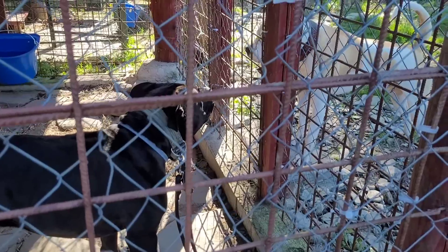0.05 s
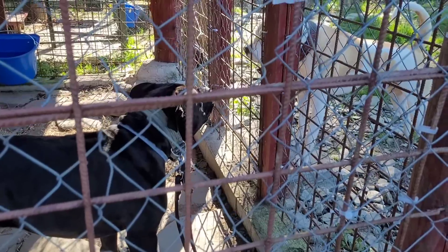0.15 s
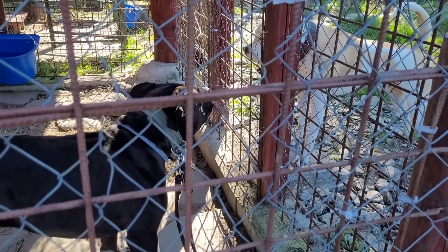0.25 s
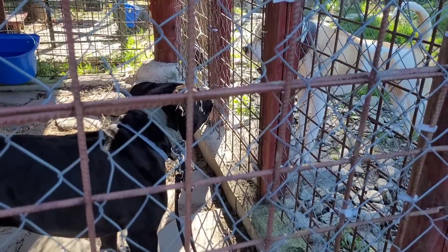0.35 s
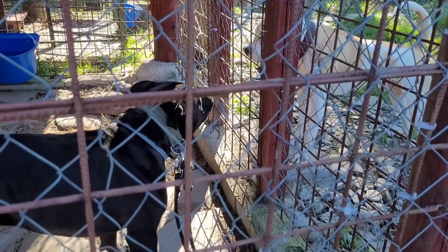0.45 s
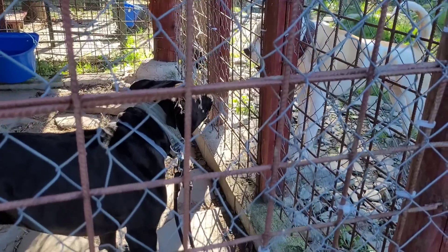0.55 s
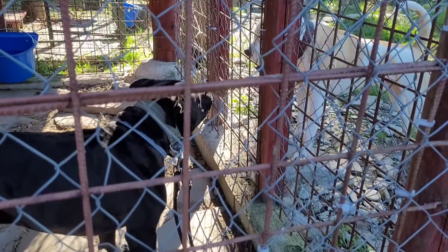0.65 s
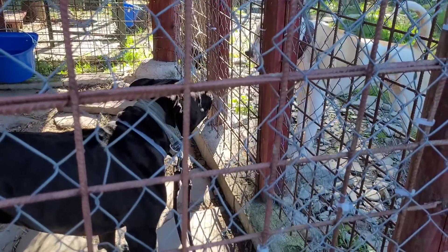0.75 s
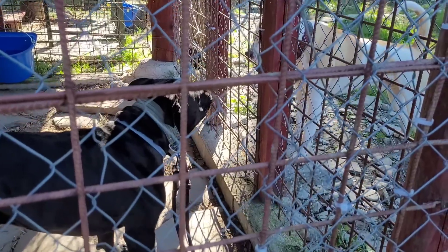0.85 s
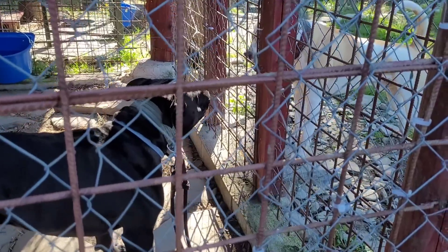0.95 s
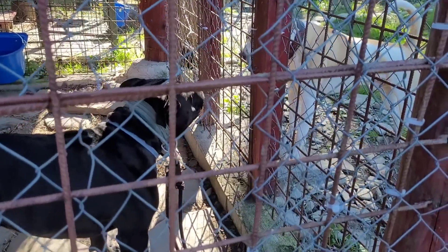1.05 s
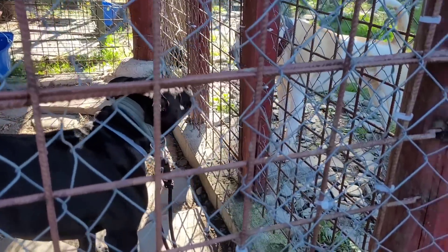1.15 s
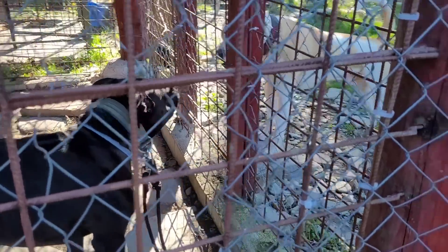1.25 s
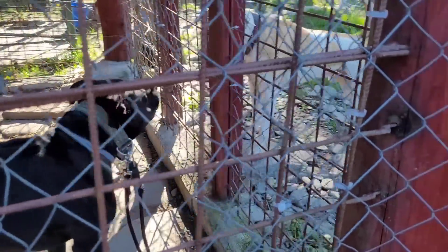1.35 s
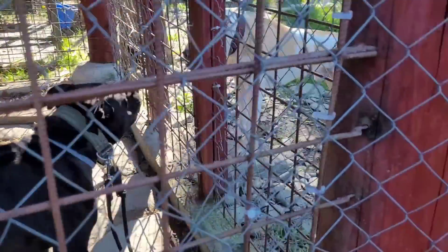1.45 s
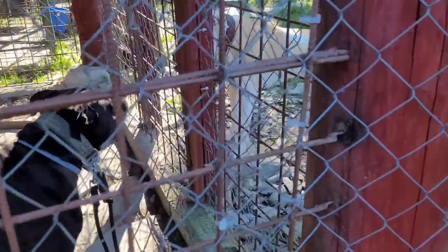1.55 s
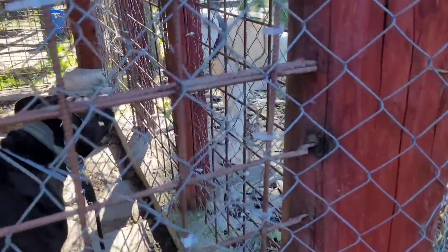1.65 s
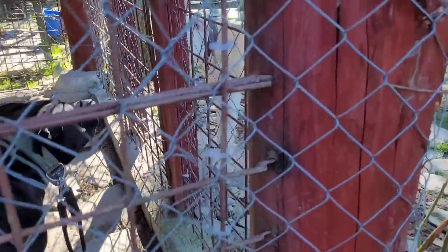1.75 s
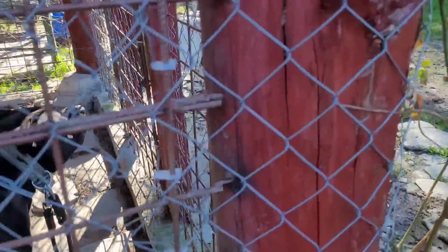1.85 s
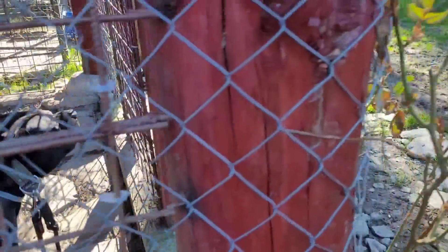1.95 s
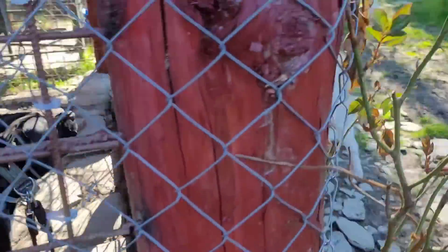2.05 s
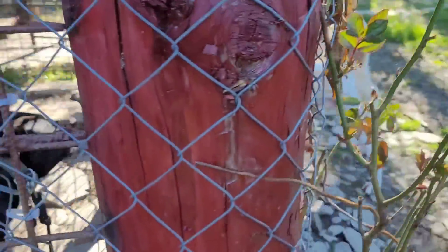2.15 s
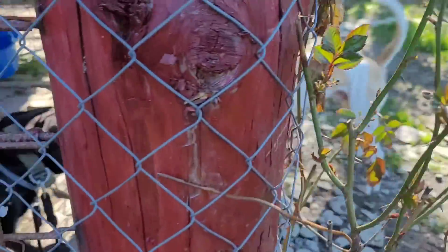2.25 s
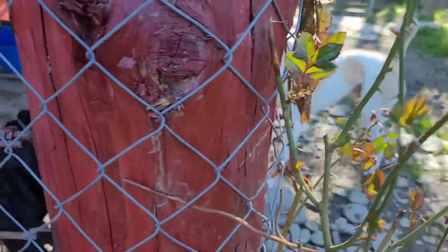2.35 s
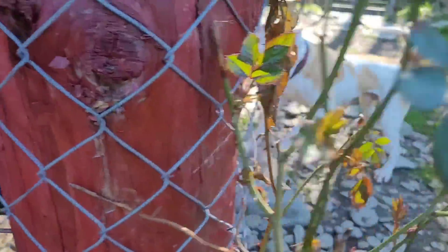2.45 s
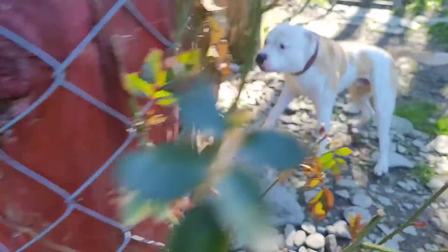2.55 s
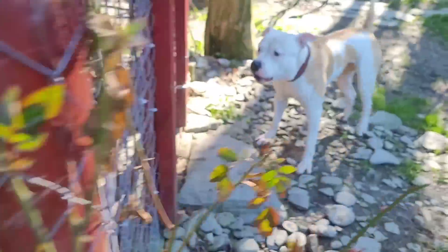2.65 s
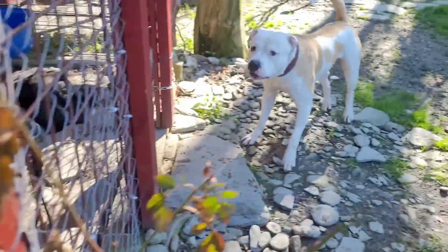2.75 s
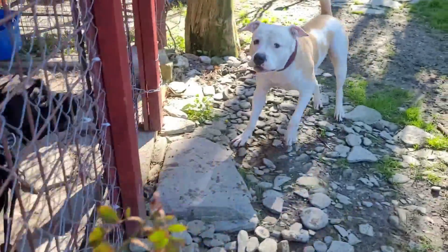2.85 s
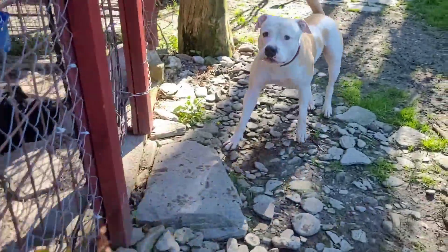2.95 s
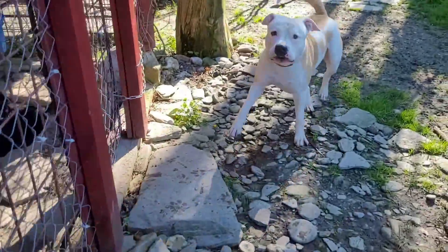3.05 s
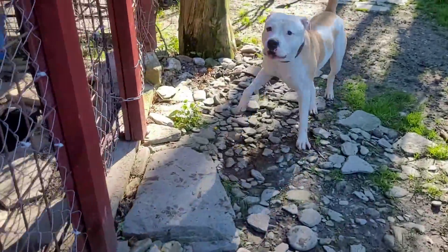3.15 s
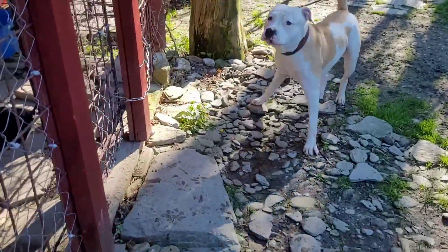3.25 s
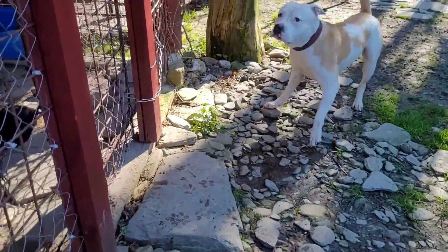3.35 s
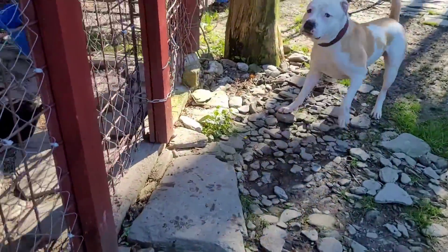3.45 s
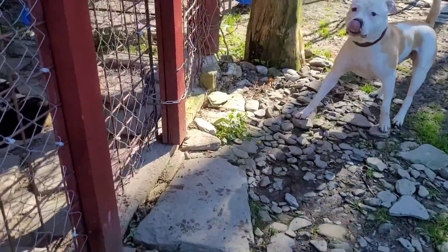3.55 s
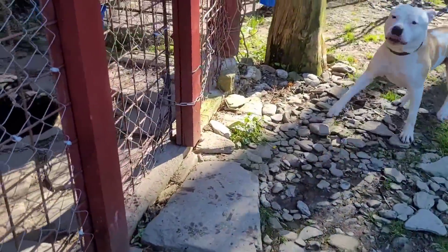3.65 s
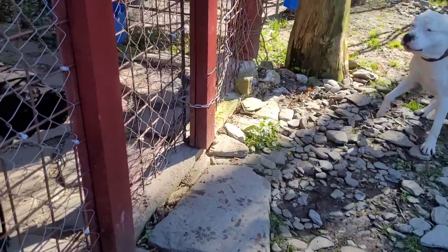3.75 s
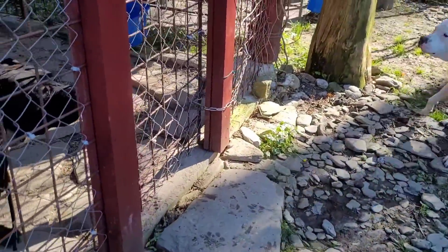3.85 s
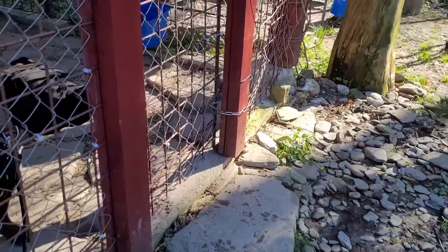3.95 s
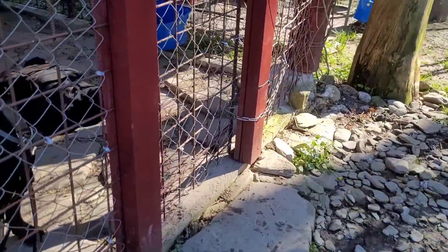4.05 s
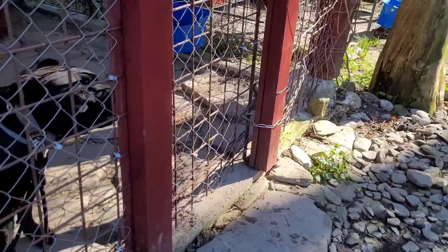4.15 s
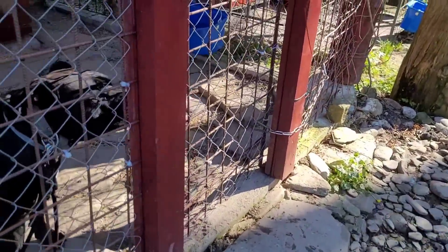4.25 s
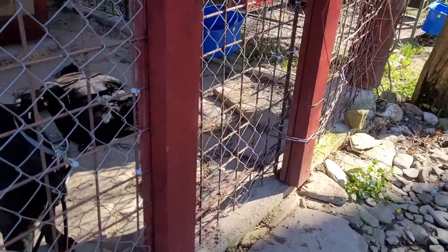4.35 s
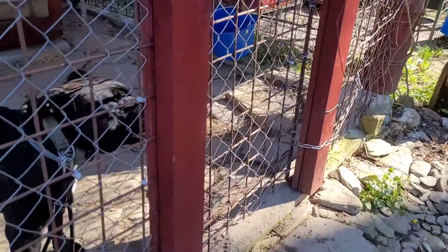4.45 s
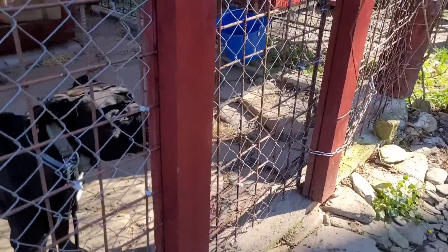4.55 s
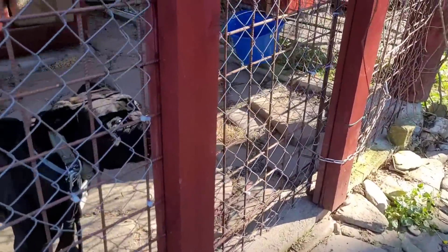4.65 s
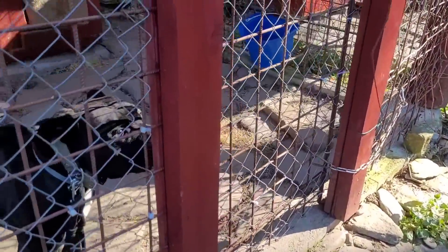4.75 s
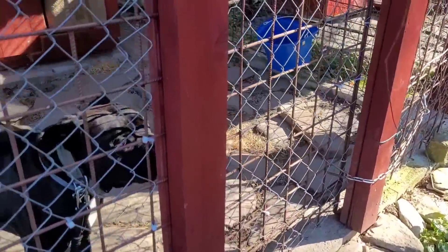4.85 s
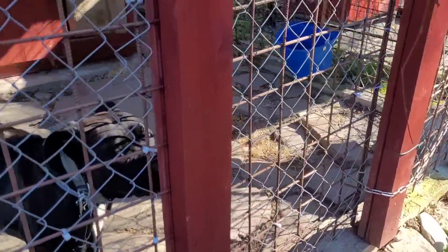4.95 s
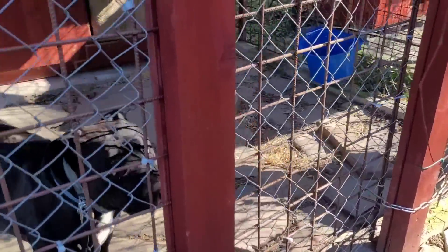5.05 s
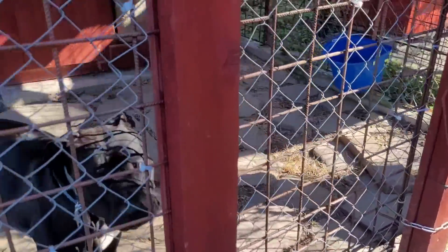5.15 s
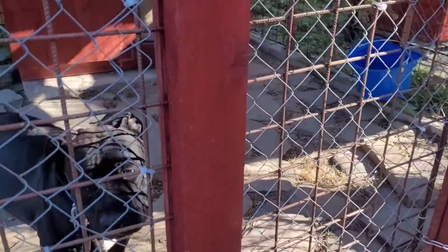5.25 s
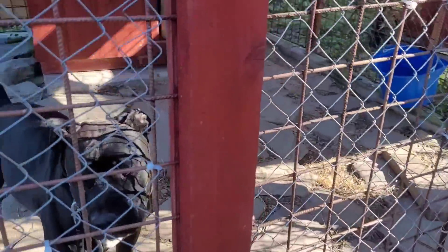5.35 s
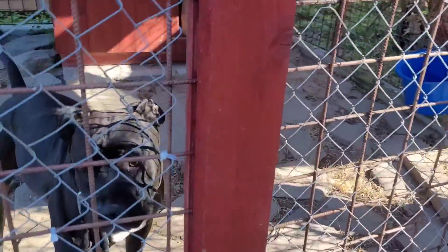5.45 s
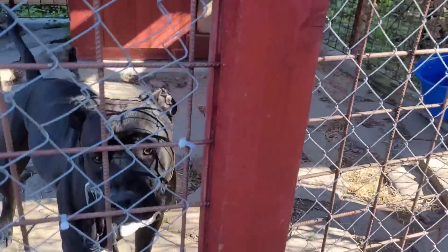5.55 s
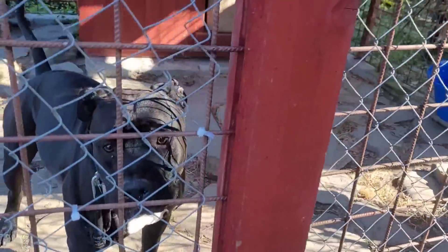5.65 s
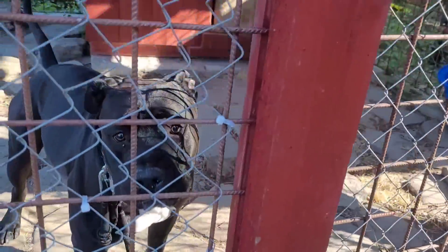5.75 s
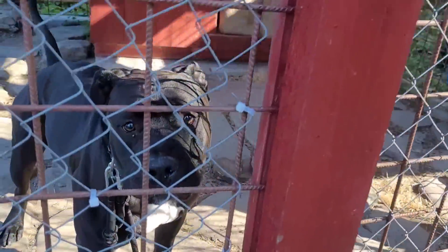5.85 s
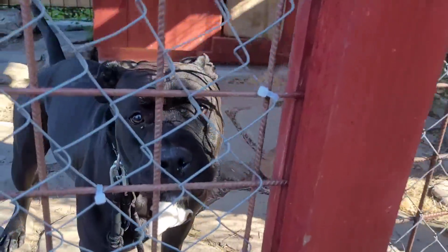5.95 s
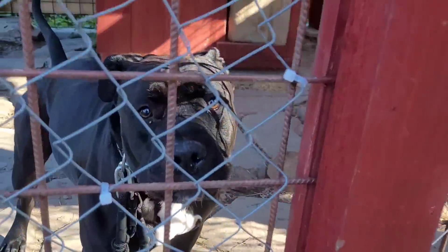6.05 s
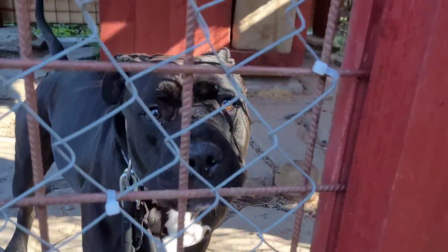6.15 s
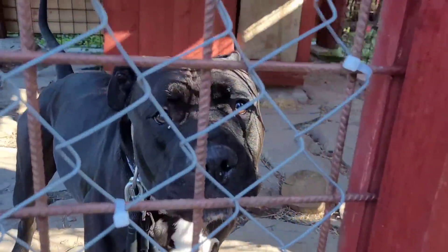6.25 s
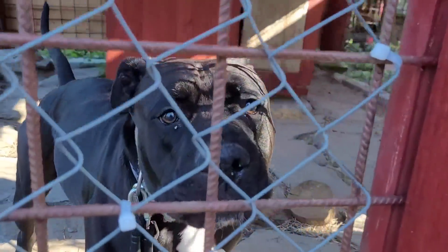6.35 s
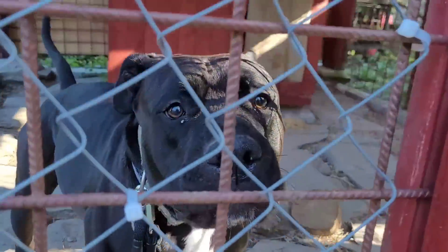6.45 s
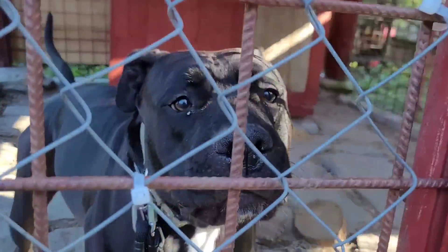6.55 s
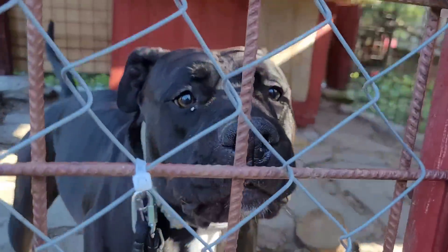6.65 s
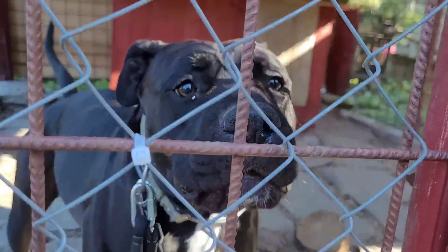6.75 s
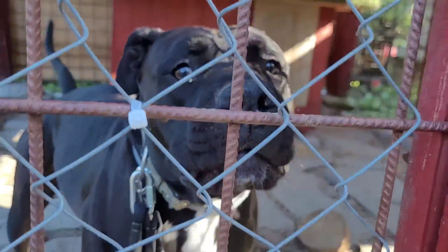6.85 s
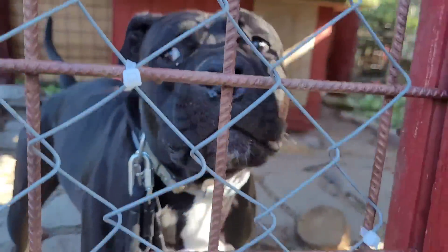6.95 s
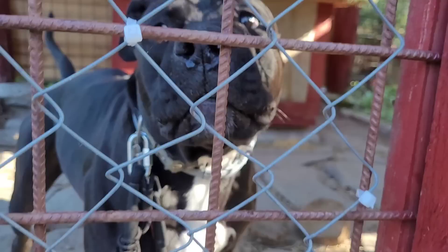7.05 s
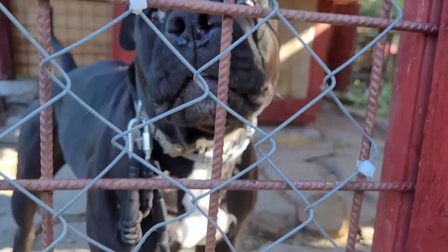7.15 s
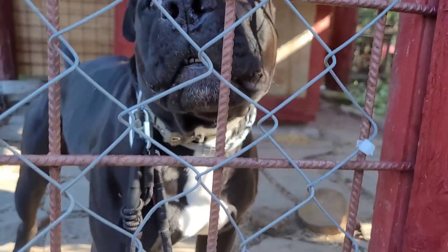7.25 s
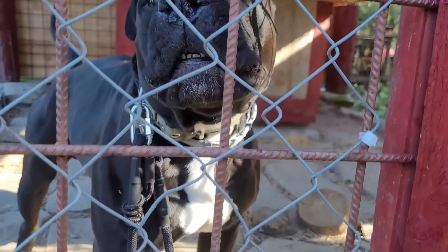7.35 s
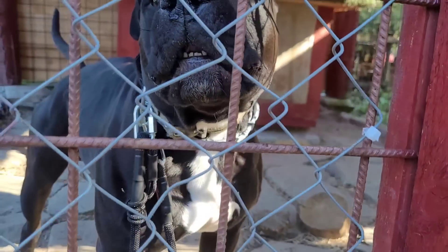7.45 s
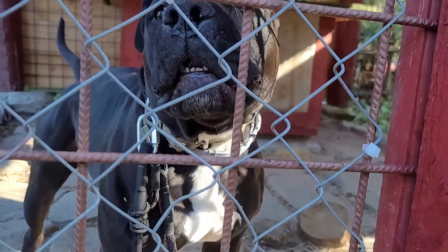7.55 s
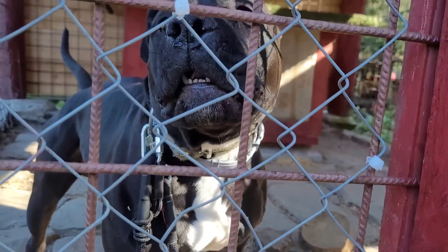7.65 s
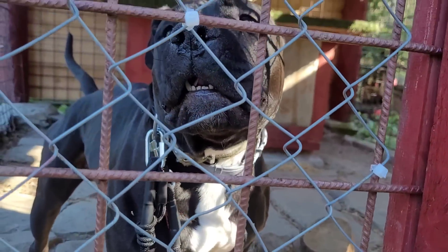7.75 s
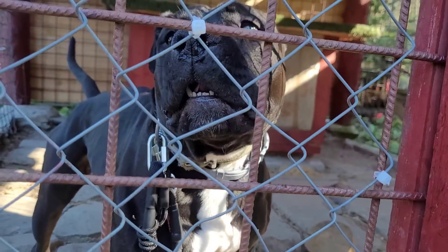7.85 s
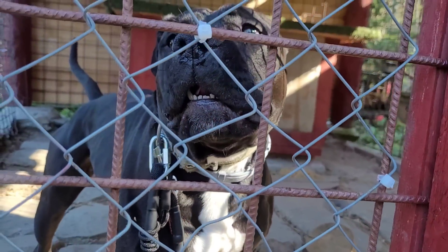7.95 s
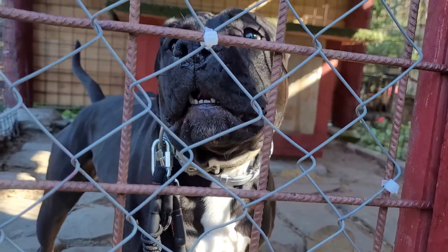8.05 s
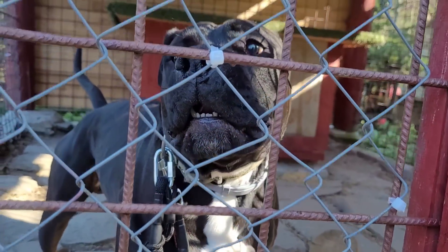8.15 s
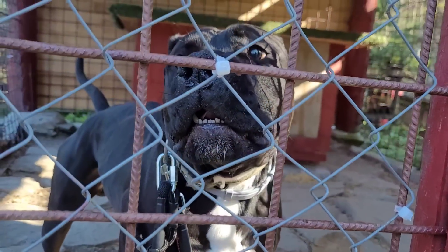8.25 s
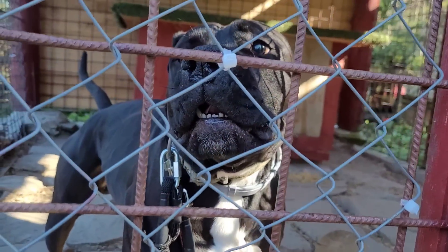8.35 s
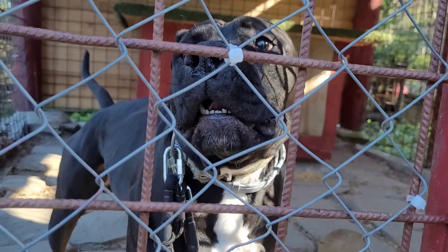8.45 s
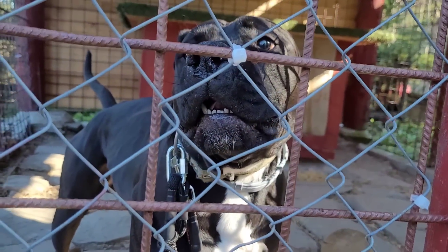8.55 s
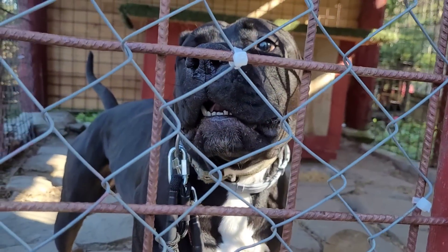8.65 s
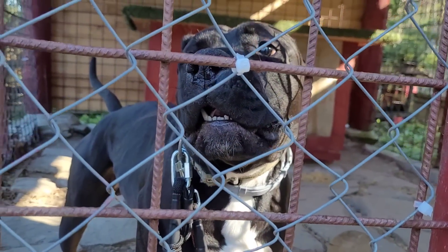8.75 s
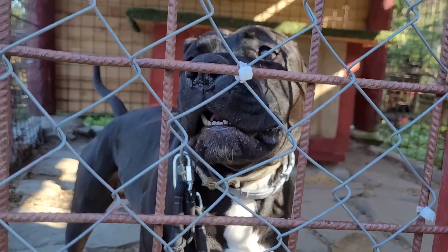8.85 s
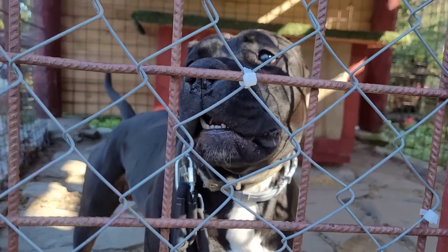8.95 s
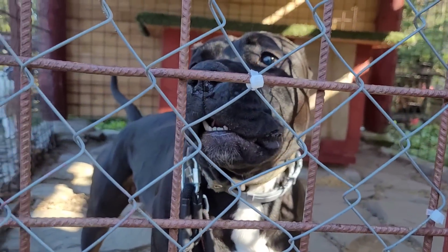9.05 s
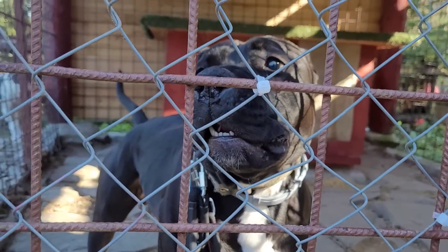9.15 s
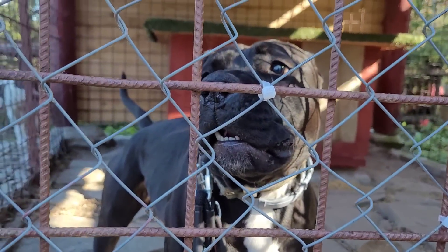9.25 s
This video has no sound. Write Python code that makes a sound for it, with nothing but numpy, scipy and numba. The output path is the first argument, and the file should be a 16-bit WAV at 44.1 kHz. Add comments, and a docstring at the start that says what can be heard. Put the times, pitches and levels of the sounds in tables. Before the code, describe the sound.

A big dog gives long, low, fluttering growls broken by two short bursts of hoarse barking in a quiet yard.

```python
"""A big dog behind a wire fence growls at another dog and breaks into hoarse barks in a stony yard. The growl
is a low buzz from the vocal folds, chopped about twenty times a second by fluttering throat tissue; it tightens
and rises. Each bark is a hard push of air through jaws that open and shut. Stones and collar hardware click,
paws scuff and a small bird whistles once. Behind it all lies the yard's hush, whose level dips for about a
second after barking."""
import sys
import numpy as np
from scipy import signal
from scipy.fft import rfft, irfft, next_fast_len
from scipy.io import wavfile
from scipy.ndimage import uniform_filter1d, map_coordinates
from numba import njit

SR = 44100
rng = np.random.default_rng(int(sys.argv[2]) if len(sys.argv) > 2 else 0)


def transcribe(signal):
    """Save signal, clipped to [-1, 1], as a 16-bit WAV file at the path in sys.argv[1]."""
    frames = np.atleast_2d(signal).T
    limited = np.clip(frames, -1, 1)
    pcm = np.round(limited * 32767).astype(np.int16)
    wavfile.write(sys.argv[1], SR, pcm)


N = 410571

# Tone colours of the background: f/Hz, level/dB
HUSH_COLOUR = [(40, -36), (130, -1), (220, 1), (350, -3.5), (540, -3.5), (2150, -16), (7000, -28.5),
               (8800, -41), (13500, -34), (16000, -61.5)]
MIC_HISS_COLOUR = [(1000, -7), (6500, 5.5), (8700, -10), (11500, 6.5), (16000, -6.5)]
GRIT_COLOUR = [(1500, -12.5), (6300, -1.5), (8500, -22), (11500, -2), (16000, -19.5)]
RUMBLE_COLOUR = [(20, -28.5), (55, -3), (85, -5.5), (300, -52)]
ECHO_COLOUR = [(400, -19), (1000, -3.5), (5000, 2.5), (12000, 8)]
# How alike left and right are: f/Hz, likeness (1 = the same)
STEREO_LIKENESS = [(180, 1), (550, .7), (1500, 0)]
# How long the echo takes to fade by 60 dB: f/Hz, time/s
ECHO_FADE = [(150, 0.73), (900, 0.26), (10000, 0.057)]
# The background sinks after barking: t/s, fall/s, hold/s, recovery/s, depth/dB
HUSH_DIPS = [(2.51, 0.27, 0.59, 0.77, 18.5), (8.153, 0.33, 0.24, 1, 9)]
# Puffs of air on the microphone: middle t/s, half length/s, boost/dB
AIR_PUFFS = [(1.945, 0.3, 10.5), (4.003, 0.35, 13.5), (5.288, 0.75, 10)]
# A bird's whistle: t/s, length/s, f/Hz, level/dB
BIRD_CALLS = [(1.157, 0.15, 6970, -62)]
# Paws slide over grit: t/s, rise/s, fall/s, level/dB
PAW_SCUFFS = [(1.6, 0.59, 0.13, -49.5), (3.75, 0.18, 0.8, -62.5)]
# Stones knocked by paws: t/s, relative level/dB, f/Hz, half width/octaves
STONE_KNOCKS = [(1.74, -28, 1600, 0.45), (1.826, -39.5, 1800, 0.36), (1.953, -33.5, 1330, 0.5),
                (1.978, -24.5, 900, 0.55), (3.419, -37, 810, 0.4), (3.491, -47.5, 2740, 1.5),
                (4.171, -39, 2000, 0.49), (4.327, -40.5, 1570, 0.7), (6.224, -36.5, 1490, 0.58)]
# Collar hardware ticks, and a chain link rings: t/s, relative level/dB, f/Hz
COLLAR_TICKS = [(1.741, -29.5, 3670), (3.197, -50, 6520), (4.138, -43.5, 4400), (4.172, -45, 4300),
                (4.328, -48, 4300), (5.047, -41, 4940), (6.8, -23, 3940), (6.835, -28, 3540),
                (6.864, -34, 3420), (8.535, -41, 3720)]
CHAIN_RINGS = [(1.954, -50, 6220)]
# Wet smacks of the lips: t/s, relative level/dB
LIP_SMACKS = [(6.3778, -23.5), (6.8008, -19)]

# Tone colours of the dog: f/Hz, level/dB
NOSE_COLOUR = [(520, 6.5), (1250, -8), (2700, -17.5), (4400, -15.5), (8500, -37)]
SNARL_COLOUR = [(300, 4.5), (520, 21), (1150, 2), (1450, -30), (2150, -15.5), (3600, -32), (4800, -21),
                (9000, -45)]
RASP_COLOUR = [(200, -36.5), (480, -7.5), (620, 8.5), (760, 1.5), (860, -11.5), (950, -12.5), (1060, -9.5),
               (1200, -29.5), (3000, -76.5)]
BREATH_COLOUR = [(400, -0.5), (1500, 6), (2300, 0.5), (8000, -36)]
LIP_COLOUR = [(2400, -16), (3800, 0), (4900, 6.5), (6100, 5), (8600, -9), (11800, -3), (14000, -2.5),
              (16000, -11.5)]  # air past closed lips
TEETH_COLOUR = [(900, -9), (1500, 6), (2650, 4), (3100, -16), (4300, -5), (4800, -0.5), (6100, -1.5),
                (8700, -20), (10300, -15), (13600, -14), (16000, -23.5)]  # air past bared teeth
SIDE_BARK_COLOUR = [(200, -19), (450, 0), (790, -4.5), (1200, -12.5), (1800, -29), (3100, -36.5),
                    (4800, -36.5), (8500, -53)]
FRONT_BARK_COLOUR = [(200, -30), (450, -2), (720, -6), (1200, -6.5), (1700, -36.5), (3500, -39),
                     (5500, -32), (6800, -46), (15000, -53)]
UPPER_THROAT_COLOUR = [(800, -19), (1250, -1), (2100, 3), (3200, -25), (6000, -48)]  # a bark's higher resonances
RATTLE_COLOUR = [(70, -24.5), (130, 6), (230, .5), (330, -5.5), (500, -58)]
# The dog draws air: t/s, rise/s, hold/s, fall/s, level/dB
NOSE_SNORTS = [(2.675, 0.036, 0.055, 0.152, -39.5)]
# Saliva between the lips: t/s, rise/s, hold/s, fall/s, level/dB, f/Hz
SALIVA_SIZZLES = [(5.412, 0.61, .45, 0.26, -59, 12160)]
# Wet wheezes: middle t/s, level/dB
WET_WHEEZES = [(6.914, -38), (6.971, -41), (7.12, -36.5), (7.166, -40), (7.214, -38), (7.263, -36.5),
               (7.364, -39), (7.412, -39)]
# Snarling catches in the throat: t/s, level/dB
THROAT_CATCHES = [(9.003, -22), (9.062, -24), (9.111, -21), (9.16, -20), (9.216, -24), (9.267, -25.5)]
# Barks and short yaps: t/s, rise/s, hold/s, fade/(dB per s), level/dB,
# then relative amounts: brightness/dB, clean tone/dB, upper throat/dB, mouth resonance/dB
BARK_PUSHES = [(2.06, 0.033, .008, 188, -12, 3, -24, -17, 2.5),
               (2.081, 0.11, 0.13, 197, -9, 0.5, -17, -14.5, -2),
               (2.399, 0.097, 0.026, 237.5, -13.5, -1.5, -10.5, -25.5, -8),
               (8.082, 0.035, 0.027, 227, -10, -4.5, -3, -19, -3.5),
               (8.124, 0.049, 0.037, 286, -7.5, -0.5, -2.5, -33.5, -6.5),
               (8.234, 0.017, 0.006, 174, -12.5, -8.5, -3, -17, 4.5)]
# The jaws open and shut through the barks: t/s, pitch/Hz, mouth resonance/Hz
JAW_MOVES = [(2.09, 290.7, 576), (2.15, 247, 450), (2.195, 303.2, 641), (2.245, 408.6, 702),
             (2.31, 479.7, 554), (2.375, 290, 529), (2.515, 412, 597), (2.56, 384, 545), (2.595, 283, 414),
             (8.125, 338.7, 512), (8.16, 441, 775), (8.25, 447, 628), (8.275, 361, 416), (8.3, 273.5, 347)]
# A squeak at the start of a bark: t/s, length/s, first f/Hz, last f/Hz, level/dB
BARK_YELPS = [(8.099, .036, 2380, 2200, -37)]
# Growls at full effort: start t/s, end t/s, pitch/Hz, throat resonance/Hz, pitch climb/share, chest/dB,
# octave against chest/dB, rasp/dB, air/dB, noisy ring against note/dB, surge per flap/dB
GROWL_SHAPES = [(1.054, 2.141, 130.6, 435.4, .04, -29, 0, -36, -57, 2, 3),
                (4.512, 8.217, 131.3, 404.2, .13, -29, -6, -31.5, -52.5, -4.5, 4),
                (8.31, 9.383, 152.6, 494, .05, -31.5, -7.5, -31, -59, -3, 0.4)]
# How hard the throat works, one list per growl: t/s, level/dB
GROWL_EFFORT = [
    [(1.12, -46.5), (1.16, -40), (1.482, -35.5), (2.04, -38.5)],
    [(4.6, -46), (5.034, -32), (5.16, -37), (5.85, -23), (6.9, -20.5), (8.05, -17)],
    [(8.38, -23.5), (9.02, -25.5), (9.3, -23.5)],
]
# How fast the throat tissue flaps: t/s, f/Hz
FLAP_RATE = [(2.1, 21), (4.5, 20.6), (5.6, 19.3), (6.85, 19.2), (7.1, 20.7), (8.1, 19.8)]
# The throat note cracks upward: middle t/s, half length/s, rise/Hz
VOICE_CRACKS = [(7.65, .02, 56.7), (7.751, .017, 67.5), (8.018, .022, 63), (8.492, .032, 54.8),
                (8.741, .034, 60.45), (9.006, .035, 43.3)]
# The teeth are bared: t/s, rise/s, hold/s, fall/s
TEETH_BARED = [(6.902, 0.36, .8, 0.15)]

HUSH_DB, RUMBLE_DB, MIC_HISS_DB = -44, -53.5, -71
TURN_S = 5.6  # barks after this time face the microphone
SHUT_HZ, WIDE_HZ = 290, 430  # bark pitch with the jaws nearly shut and wide open
FULL_EFFORT_DB = -19
CHEST_GROWS, RASP_GROWS, AIR_GROWS, WHISTLE_GROWS = .49, .67, .45, .65  # dB per dB of effort


def amp(db):
    """Turn decibels into a gain."""
    return 10 ** (np.asarray(db) / 20)


def unit(x):
    """Scale x to an average power of 1."""
    return x / np.sqrt(np.mean(x ** 2) + 1e-20)


def steady(x):
    """Even out the loudness of x, keeping a power of 1."""
    return unit(x / np.sqrt(np.abs(uniform_filter1d(x * x, size=500)) + 1e-12))


def along(points, hz):
    """Read (frequency, value) points at hz, on a log axis."""
    f, v = np.transpose(points)
    return np.interp(np.log(hz + 1), np.log(f + 1), v)


def curves(rows, t):
    """Read each column after the first at the times t."""
    s, *cols = np.transpose(rows)
    return [np.interp(t, s, c) for c in cols]


def span(start, end):
    """Sample times from start to end."""
    return np.arange(int(start * SR), int(end * SR)) / SR


def plateau(t, start, rise, hold, fall):
    """Go from 0 to 1 and back in straight lines."""
    return np.clip(np.minimum((t - start) / rise, (start + rise + hold + fall - t) / fall), 0, 1)


def add(track, s, x):
    """Mix x into the track at time s."""
    part = track[max(int(s * SR), 0):][:len(x)]
    part += x[:len(part)]


def wobble(rate, t):
    """A smooth curve through `rate` random values a second."""
    return map_coordinates(rng.standard_normal(int(N * rate / SR) + 4), [t * rate])


def noise(t):
    """White noise over the times t."""
    return rng.standard_normal(N)[:len(t)]


def filtered(x, response):
    """Scale each frequency in x by response(frequency)."""
    size = x.shape[-1]
    m = next_fast_len(size + 8192)
    return irfft(rfft(x, m) * response(np.fft.rfftfreq(m, 1 / SR)), m)[..., :size]


def coloured(x, colour):
    """Give x a tone colour, at power 1."""
    return unit(filtered(x, lambda hz: amp(along(colour, hz))))


def band(t, hz, octaves):
    """Noise in a band around hz, at power 1."""
    return unit(filtered(noise(t), lambda f: 1 / (1 + np.abs(np.log2((f + 1) / hz) / octaves) ** 3)))


def above(x, edge_hz):
    """Cut the lows below a moving edge by fading between two filters."""
    low, high = (filtered(x, lambda f: 1 - 1 / (1 + (f / hz) ** 16))
                 for hz in (edge_hz.min(), edge_hz.max()))
    return low + (high - low) * (edge_hz - edge_hz.min()) / (np.ptp(edge_hz) + 1e-9)


@njit
def resonate(x, hz, width_hz, sr):
    """Make x ring at a moving frequency."""
    y, state = np.zeros(len(x)), 0j
    for i in range(len(x)):
        state = state * np.exp((-np.pi * width_hz + 2j * np.pi * hz[i]) / sr) + x[i]
        y[i] = state.real
    return y


def cavity(x, hz, widths_hz):
    """The air in a throat or mouth rings: two resonances in a row."""
    return resonate(resonate(x, hz, widths_hz[0], SR), hz, widths_hz[1], SR)


def stereo_noise(colour, likeness):
    """Noise of power 1 whose two sides are partly alike."""
    def response(hz):
        angle = np.arccos(np.clip(along(likeness, hz), -1, 1)) / 2
        return amp(along(colour, hz)) * [np.cos(angle), np.sin(angle)]
    mid, side = filtered(rng.standard_normal((2, N)), response)
    return unit(np.array([mid + side, mid - side]))


def placed(x, lead_s, left_db):
    """Make x stereo: the left side is lead_s earlier, and left_db against the right."""
    half = np.array([[.5], [-.5]])
    return filtered(x, lambda hz: amp(half * left_db) * np.exp(2j * np.pi * half * hz * lead_s))


def yard():
    """The outdoor hush, and light air rumbling on the microphone, mostly on the left."""
    t = np.arange(N) / SR
    dip_db = sum(depth * plateau(t, *shape) for *shape, depth in HUSH_DIPS)
    gust_db = sum(db * np.exp(-((t - s) / half) ** 2) for s, half, db in AIR_PUFFS)
    hush = amp(HUSH_DB) * stereo_noise(HUSH_COLOUR, STEREO_LIKENESS)
    rumble = stereo_noise(RUMBLE_COLOUR, likeness=[(30, .49)])
    rumble *= amp(RUMBLE_DB + gust_db + 1.3 * wobble(32, t) + [[1.5], [-2.5]])
    return amp(-dip_db) * (hush + rumble)


def wall_echo(x):
    """Walls and paving scatter a short echo, different at each ear."""
    hz, t, bands = signal.stft(rng.standard_normal((2, SR // 3)), SR, nperseg=256)
    tail = signal.istft(bands * amp(-60 * t / along(ECHO_FADE, hz)[:, None]), SR, nperseg=256)[1]
    tail = filtered(tail / np.linalg.norm(tail[0]), lambda f: amp(along(ECHO_COLOUR, f)))
    return signal.fftconvolve(np.pad(x, (130, 0))[None], tail, axes=1)[:, :N]


def bird():
    """A far-off bird whistles one thin note."""
    track = np.zeros(N)
    for s, length, hz, db in BIRD_CALLS:
        t = span(0, length)
        cycles = np.cumsum(hz + 15 * wobble(44, t)) / SR
        add(track, s, amp(db) * np.sin(np.pi * t / length) * np.sin(2 * np.pi * cycles))
    return track


def scuffs():
    """Grit crunches unevenly under a sliding paw."""
    track = np.zeros(N)
    for s, rise, fall, db in PAW_SCUFFS:
        t = span(0, rise + fall)
        grains = unit(amp(5.5 * wobble(100, t)) * coloured(noise(t), GRIT_COLOUR))
        add(track, s, amp(db) * plateau(t, 0, rise, 0, fall) * grains)
    return track


def clicks(rows, fade_s):
    """Each knock is a burst of noise in its own band, dying by 60 dB in fade_s."""
    track, t = np.zeros(N), span(0, .2)
    for s, db, hz, octaves in rows:
        add(track, s, amp(db + 4 - 60 * t / fade_s) * steady(band(t, hz, octaves)))
    return track


def stones():
    """Paws knock stones together."""
    return clicks(STONE_KNOCKS, fade_s=.025)


def chain_link(octaves=.08):
    """A struck link of the collar chain rings on in a narrow band."""
    return clicks([(*row, octaves) for row in CHAIN_RINGS], fade_s=.25)


def collar(octaves=.42):
    """Collar hardware knocks together in dry ticks."""
    return clicks([(*row, octaves) for row in COLLAR_TICKS], fade_s=.011)


def lip_smacks(hz=11830, octaves=.27, trim_db=-12):
    """Wet lips smack with a tiny, high click."""
    return clicks([(s, db + trim_db, hz, octaves) for s, db in LIP_SMACKS], fade_s=.013)


def snorts():
    """Air rushes in through the nose."""
    track = np.zeros(N)
    for s, rise, hold, fall, db in NOSE_SNORTS:
        t = span(0, rise + hold + fall)
        add(track, s, amp(db) * plateau(t, 0, rise, hold, fall) ** 2 * coloured(noise(t), NOSE_COLOUR))
    return track


def sizzles():
    """Saliva sizzles between the lips, pulsing as fast as the throat flaps."""
    track = np.zeros(N)
    for s, rise, hold, fall, db, hz in SALIVA_SIZZLES:
        t = span(0, rise + hold + fall)
        flaps = np.cumsum(curves(FLAP_RATE, s + t)[0]) / SR
        spits = amp(6.1 * np.cos(2 * np.pi * flaps) + 3.5 * wobble(140, t))
        sizzle = unit(spits * band(t, hz, octaves=.07))
        add(track, s, amp(db) * plateau(t, 0, rise, hold, fall) * sizzle)
    return track


def wheezes(length_s=.012):
    """Wet wheezes: very short puffs of high, narrow noise."""
    track, t = np.zeros(N), span(0, length_s)
    for s, db in WET_WHEEZES:
        puff = np.hanning(len(t)) * steady(band(t, hz=4700, octaves=.09))
        add(track, s - length_s / 2, amp(db) * puff)
    return track


def vocal_folds(cycles, t, scatter_db, sharp):
    """Each cycle of the folds gives one uneven pulse and a puff of noisy air."""
    pulses = np.diff(np.floor(cycles), prepend=np.floor(cycles[0])) * amp(scatter_db * wobble(150, t))
    puffs = noise(t) * np.exp(sharp * np.cos(2 * np.pi * cycles))
    return unit(pulses - pulses.mean()), unit(puffs)


def snarls(pitch_hz=165.3):
    """The throat catches for just a few beats of the folds."""
    track, t = np.zeros(N), span(0, .018)
    shape = plateau(t, 0, rise=.0024, hold=.00594, fall=.00684)
    for s, db in THROAT_CATCHES:
        pulses, puffs = vocal_folds(pitch_hz * t, t, scatter_db=-2, sharp=.59)
        add(track, s, amp(db) * shape * coloured(pulses + puffs, SNARL_COLOUR))
    return track


def yelps():
    """A short, rough squeak slides down at the start of a bark."""
    track = np.zeros(N)
    for s, length, first_hz, last_hz, db in BARK_YELPS:
        t = span(0, length)
        hz = np.linspace(first_hz, last_hz, len(t)) * (1 + .03 * wobble(500, t))
        add(track, s, amp(db) * np.hanning(len(t)) * unit(np.sin(2 * np.pi * np.cumsum(hz) / SR)))
    return track


def bark(start, rise, hold, fade_db_per_s, db, bright_db, tone_db, upper_db, mouth_db):
    """A hard push of air rattles the folds while the mouth opens and shuts."""
    t = span(0, rise + hold + 45 / fade_db_per_s)
    push = np.minimum(t / rise, 1) ** 2 * amp(db - fade_db_per_s * np.maximum(t - rise - hold, 0))
    pitch_hz, mouth_hz = curves(JAW_MOVES, start + t)
    cycles = np.cumsum(pitch_hz * (1 + .035 * wobble(220, t))) / SR
    pulses, puffs = vocal_folds(cycles, t, scatter_db=6, sharp=1.4)
    buzz = unit(pulses + .8 * puffs)
    mouth = steady(cavity(pulses + puffs, mouth_hz, widths_hz=(110., 200.)))
    colour = FRONT_BARK_COLOUR if start > TURN_S else SIDE_BARK_COLOUR
    voice = coloured(buzz, colour) + amp(mouth_db) * mouth
    # wide jaws lose the bass; closing ones leave a round, low tone
    wide = np.clip((pitch_hz - SHUT_HZ) / (WIDE_HZ - SHUT_HZ), 0, 1)
    voice = unit(voice - wide * filtered(voice, lambda f: 1 / (1 + (f / 370) ** 10)))
    voice = steady(voice + amp(tone_db + 5.5 * (1 - wide)) * unit(np.sin(2 * np.pi * cycles)))
    body = filtered(voice, lambda f: 1 / (1 + (f / 800) ** 6))
    hiss = filtered(voice, lambda f: 1 - 1 / (1 + (f / 3400) ** 8))
    # the air is fastest partway through the hold; slower air dulls the bark but spares most of the hiss
    slow = 1 - np.exp(-((t - rise - .4 * hold) / (.009 + .7 * hold)) ** 2)
    upper = voice - body - hiss + amp(upper_db) * coloured(buzz, UPPER_THROAT_COLOUR)
    upper += amp(5 * slow) * hiss
    return push * (body + amp(bright_db - 4 - 6.5 * slow) * upper)


def barks():
    """Two tracks: barks heard from the side, and from the front."""
    side, front = np.zeros((2, N))
    for row in BARK_PUSHES:
        add(front if row[0] > TURN_S else side, row[0], bark(*row))
    return side, front


def swing(flaps, lag):
    """One wave per flap of the throat, late by lag cycles."""
    return np.cos(2 * np.pi * (flaps - lag))


def throb(flaps, depth, lag):
    """A gain that swells once per flap."""
    return unit(1 + depth * swing(flaps, lag))


def nose_whistle(t, flaps, pitch_hz=4770):
    """Air squeezes through the nose in a thin whistle that swells with every flap."""
    hz = pitch_hz * (1 + .012 * wobble(40, t) + .026 * wobble(1100, t))
    swell = .3 + np.maximum(swing(flaps, lag=.22), 0) ** 4
    return unit(np.sin(2 * np.pi * np.cumsum(hz) / SR) * swell * amp(3.2 * wobble(25, t)))


def mouth_air(pulses, puffs, flaps, bared, effort_db):
    """Air spits past closed lips or rushes past bared teeth, along with plain breath."""
    lips = coloured(1.3 * pulses + puffs * throb(flaps, depth=.31, lag=.15), LIP_COLOUR)
    teeth = coloured(.25 * pulses + puffs * throb(flaps, depth=.43, lag=.1), TEETH_COLOUR)
    breath = coloured(puffs * throb(flaps, depth=.37, lag=.054), BREATH_COLOUR)
    return np.sqrt(1 - bared) * lips + bared ** 2 * amp(4) * teeth + amp(-.11 * effort_db) * breath


def chest_tone(t, cycles, puffs, flaps, effort_db, octave_db):
    """The low note, strongest while the flap is shut, and its octave. Slack folds rattle more."""
    rattle = (.36 - .02 * effort_db) * coloured(puffs, RATTLE_COLOUR)
    low = (np.sin(2 * np.pi * cycles) + rattle) * np.sqrt(1 + .92 * swing(flaps, lag=0))
    octave = np.sin(2 * np.pi * 2 * cycles + .42 * wobble(45, t)) * throb(flaps, depth=.44, lag=-.31)
    return low + amp(octave_db + 3 * wobble(70, t)) * octave


def throat_note(t, cycles, flaps):
    """The throat lifts a note at three times the pitch, which wavers and cracks upward."""
    cracks_hz = sum(hz * np.exp(-((t - s) / half) ** 2) for s, half, hz in VOICE_CRACKS)
    bend_hz = cracks_hz + 11 * wobble(40, t) - 6 * swing(flaps, lag=.11)
    return unit(np.sin(2 * np.pi * (3 * cycles + np.cumsum(bend_hz) / SR) + .3 * wobble(160, t)))


def throat_ring(pulses, puffs, throat_hz, bared, level_db):
    """Swirling air rings in the throat; bared teeth boost it and add a higher, wider resonance."""
    ring = steady(cavity(pulses + .94 * puffs, throat_hz, widths_hz=(80., 85.)))
    mouth = unit(cavity(puffs, 1.214 * throat_hz, widths_hz=(140., 160.)))
    return amp(level_db + 7 * bared) * ring + amp(-15) * bared * mouth


def growl(row, effort):
    """The folds buzz under a fluttering flap of tissue; effort sets the level of every layer."""
    start, end, base_hz, base_throat_hz, climb, chest_db, octave_db, rasp_db, air_db, ring_db, flap_db = row
    t = span(start, end)
    effort_db = curves(effort, t)[0] - FULL_EFFORT_DB
    bared = plateau(t, *TEETH_BARED[0])
    # the throat tightens slowly at first, then faster; a slack growl sits lower
    tension = climb * np.linspace(0, 1, len(t)) ** 2.4
    pitch_hz = base_hz * (1 + tension) + .51 * effort_db
    throat_hz = base_throat_hz * (1 + 1.53 * tension)
    # running counts of the slow flaps and the fast fold cycles
    flaps = np.cumsum(curves(FLAP_RATE, t)[0]) / SR + .06 * wobble(14, t)
    cycles = np.cumsum(pitch_hz * (1 + .01 * swing(flaps, lag=.28) + .015 * wobble(70, t))) / SR
    pulses, puffs = vocal_folds(cycles, t, scatter_db=7, sharp=1)
    chest = chest_tone(t, cycles, puffs, flaps, effort_db, octave_db)
    ring = throat_ring(pulses, puffs, throat_hz, bared, ring_db - .55 * effort_db)
    throat = steady(throat_note(t, cycles, flaps) + above(ring, .9 * throat_hz))
    # one surge per flap, no two alike; bared teeth soften them
    surge_db = flap_db * (1 - .52 * bared) * (1 + .28 * wobble(7.2, t)) * swing(flaps, lag=-.029)
    throat = unit(throat * amp(surge_db + wobble(45, t)))
    rasp = unit(steady(coloured(puffs, RASP_COLOUR)) * throb(flaps, depth=.33, lag=.39))
    voice = (amp(chest_db + CHEST_GROWS * effort_db) * chest
             + amp(FULL_EFFORT_DB + effort_db) * throat
             + amp(rasp_db + RASP_GROWS * effort_db) * rasp
             + amp(air_db + AIR_GROWS * effort_db) * mouth_air(pulses, puffs, flaps, bared, effort_db)
             + amp(-55.5 + WHISTLE_GROWS * effort_db) * nose_whistle(t, flaps))
    fade_s = .019
    return voice * plateau(t, start, fade_s, end - start - 2 * fade_s, fade_s)


def growls():
    """Three growls, each with its own rise and fall of effort."""
    track = np.zeros(N)
    for row, effort in zip(GROWL_SHAPES, GROWL_EFFORT):
        add(track, row[0], growl(row, effort))
    return track


def scene():
    """Mix the dog with the yard; its voice echoes more than the small sounds do."""
    voice = growls() + snorts() + sizzles() + wheezes() + snarls()
    small = stones() + chain_link() + scuffs() + bird()
    near = collar() + lip_smacks()
    side, front = barks()
    front += yelps()
    direct = (placed(voice, lead_s=.00011, left_db=-.5)
              + placed(side, lead_s=.00015, left_db=-2.5)
              + placed(front, lead_s=0, left_db=-1.3) + small + near)
    echo = wall_echo(voice + amp(-2) * (side + front) + amp(-11) * small + amp(-17) * near)
    return direct + echo + yard() + amp(MIC_HISS_DB) * stereo_noise(MIC_HISS_COLOUR, STEREO_LIKENESS)


def record(dry):
    """Round off the loudest peaks and cut the very highest treble."""
    rounded = dry / (1 + np.abs(dry) ** 6) ** (1 / 6)
    return filtered(rounded, lambda hz: hz < 15900)


dry = scene()
out = record(dry)
transcribe(out)
```